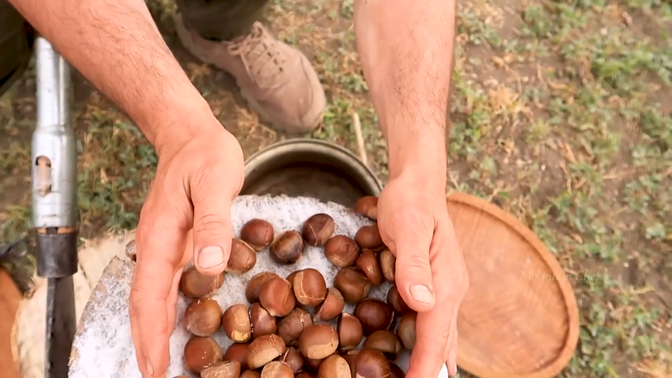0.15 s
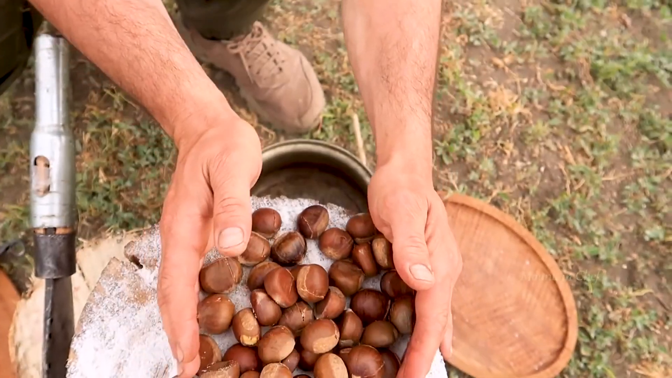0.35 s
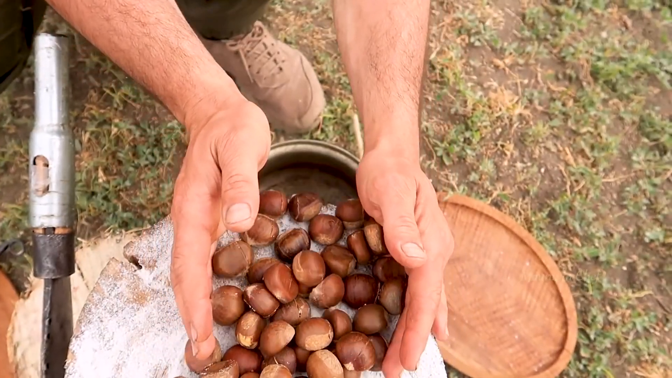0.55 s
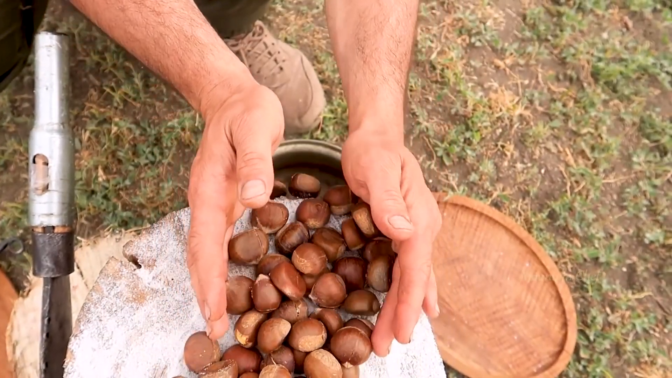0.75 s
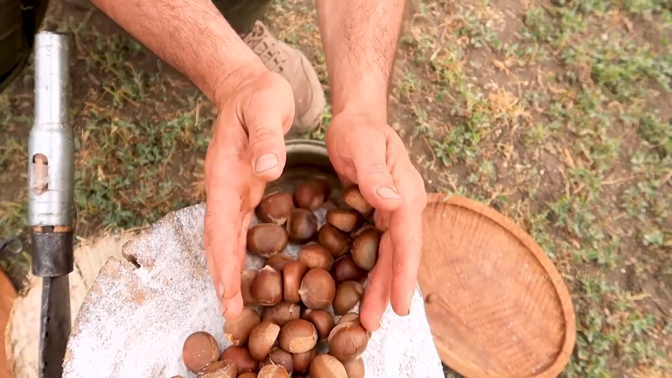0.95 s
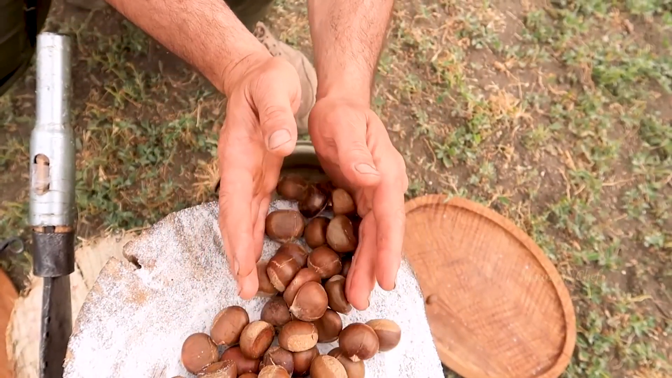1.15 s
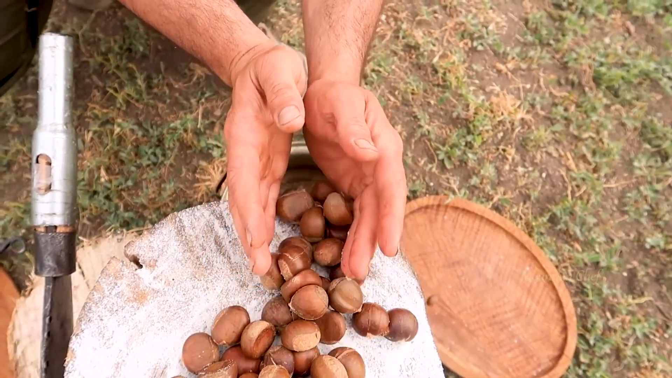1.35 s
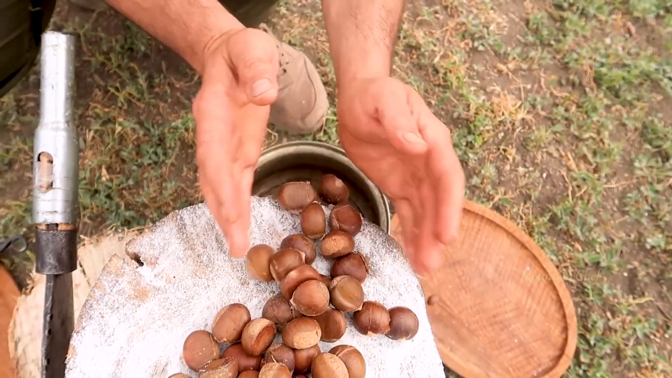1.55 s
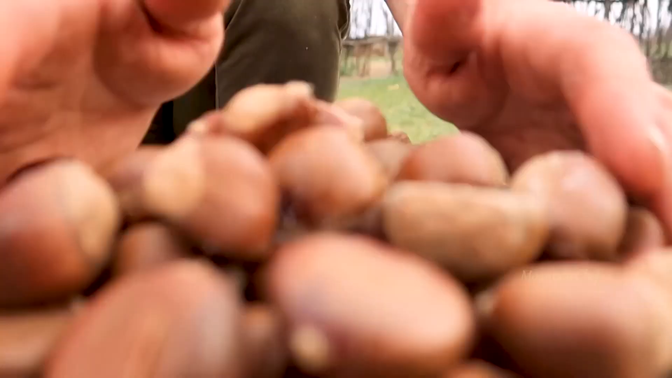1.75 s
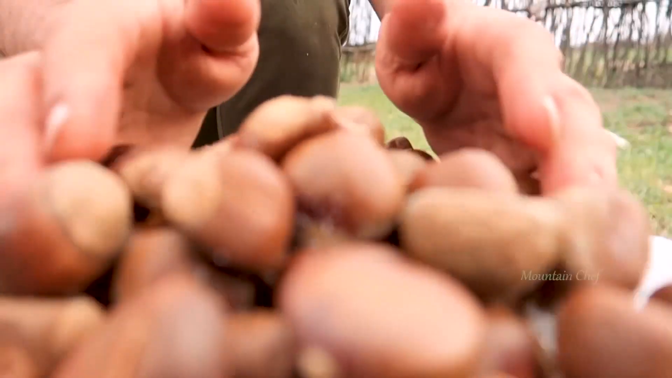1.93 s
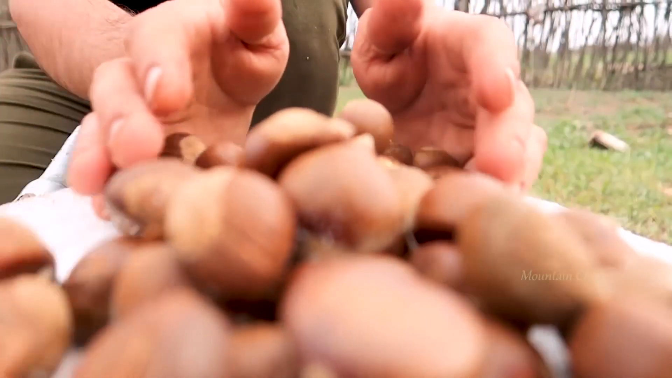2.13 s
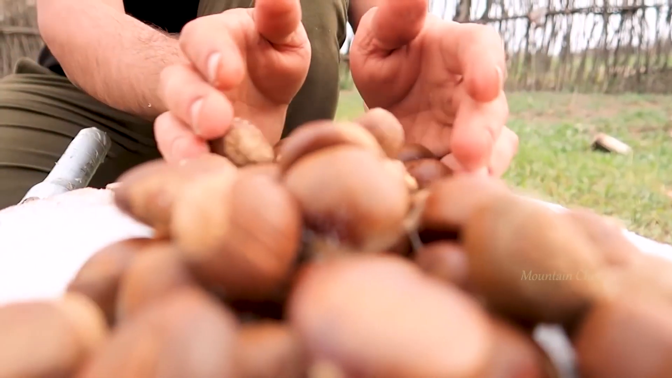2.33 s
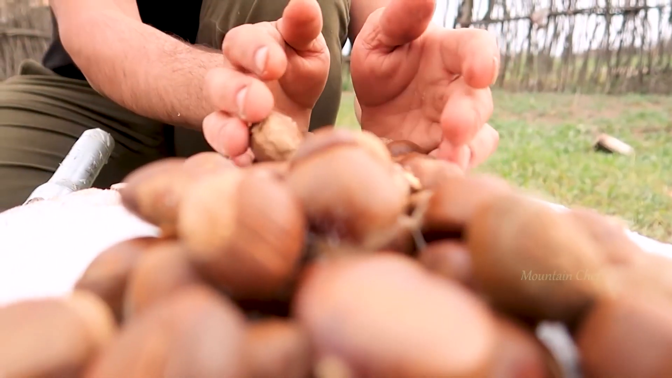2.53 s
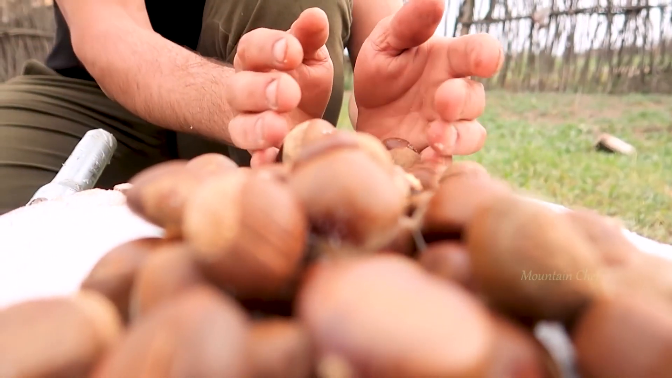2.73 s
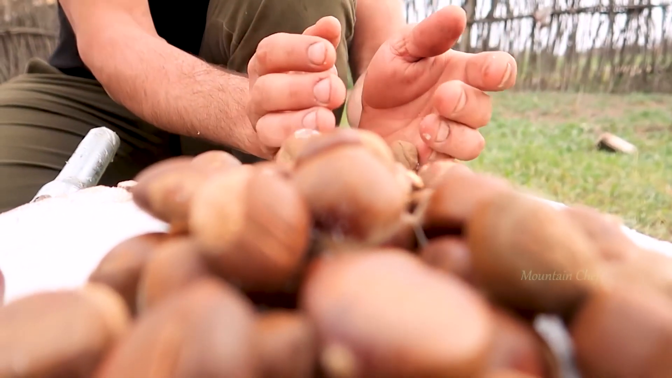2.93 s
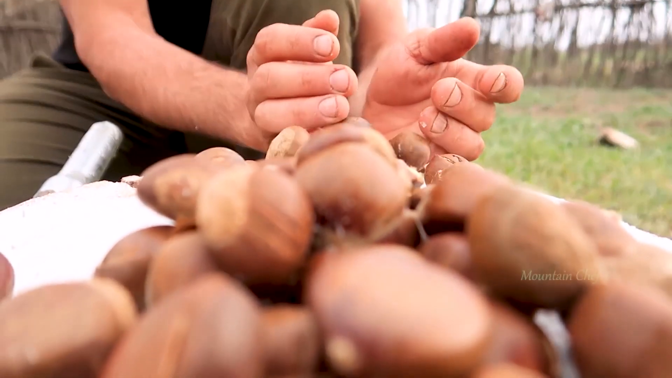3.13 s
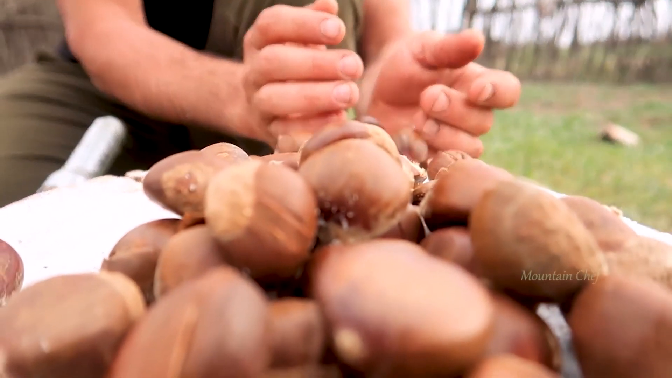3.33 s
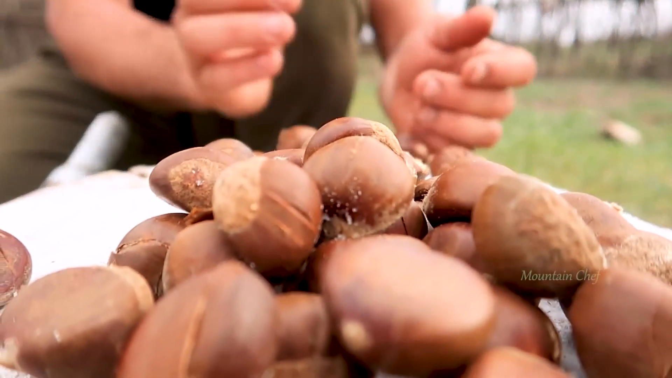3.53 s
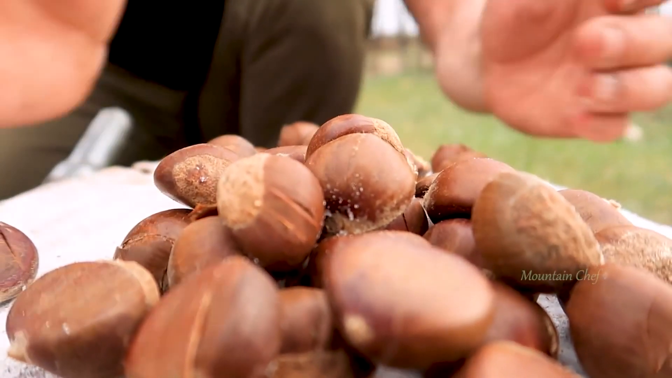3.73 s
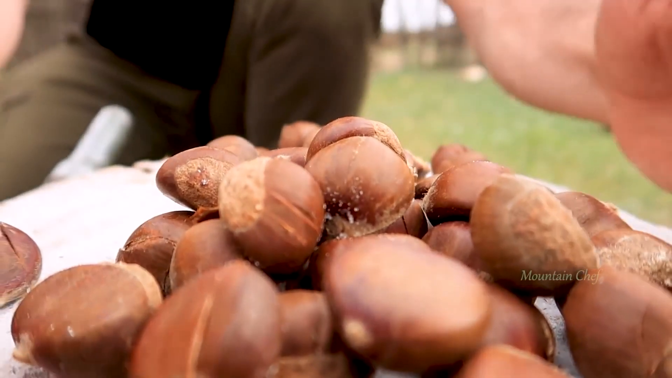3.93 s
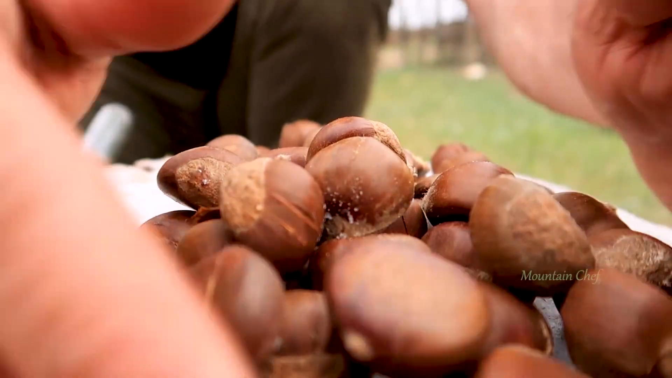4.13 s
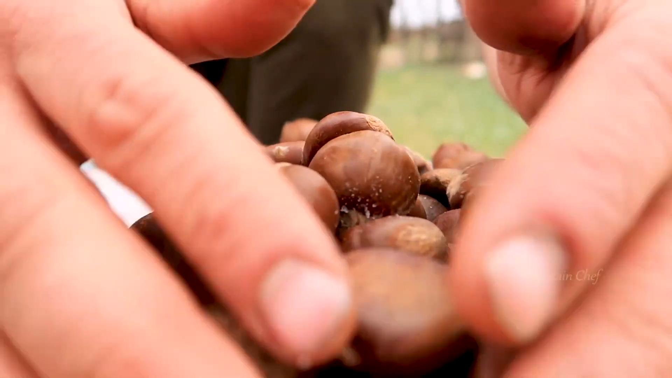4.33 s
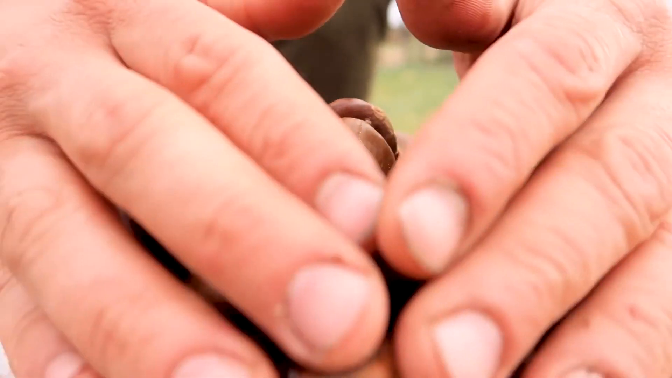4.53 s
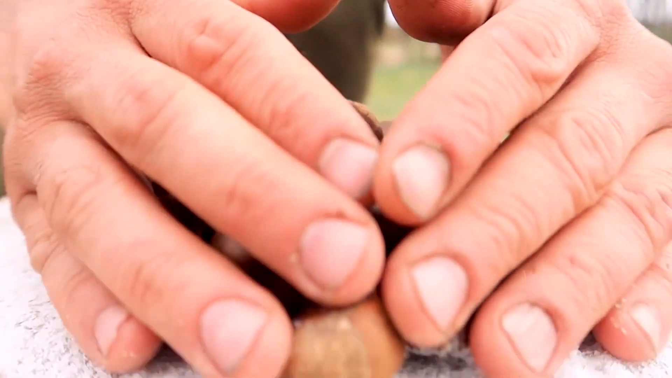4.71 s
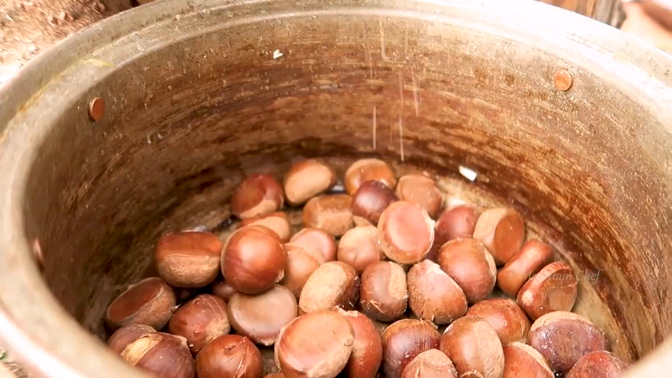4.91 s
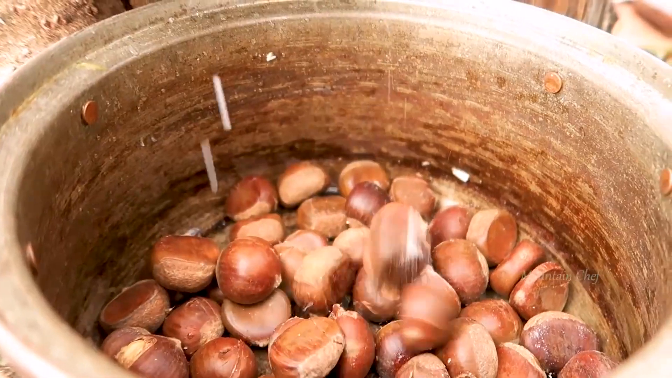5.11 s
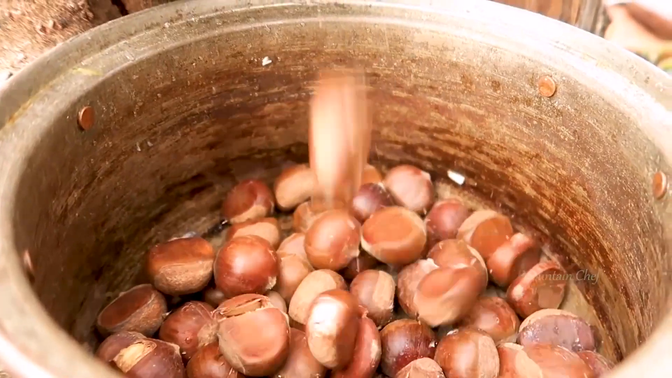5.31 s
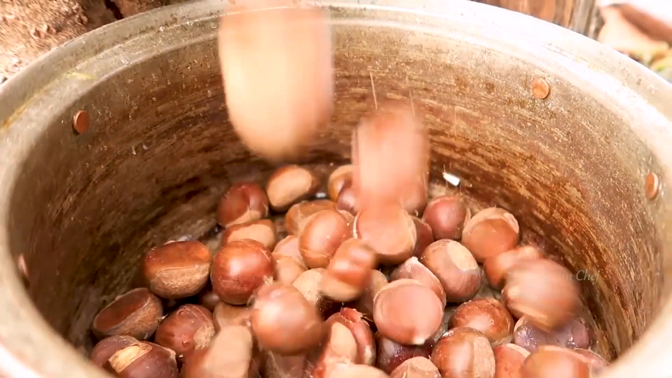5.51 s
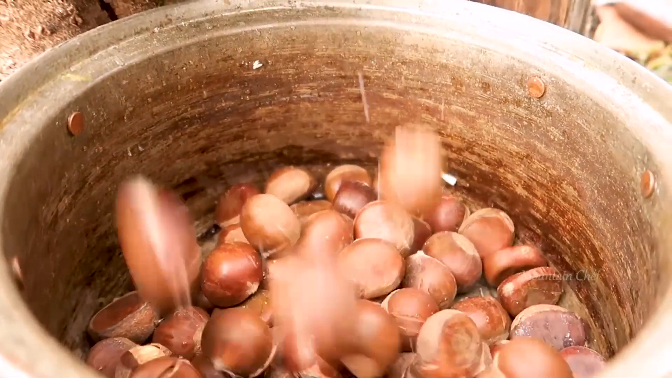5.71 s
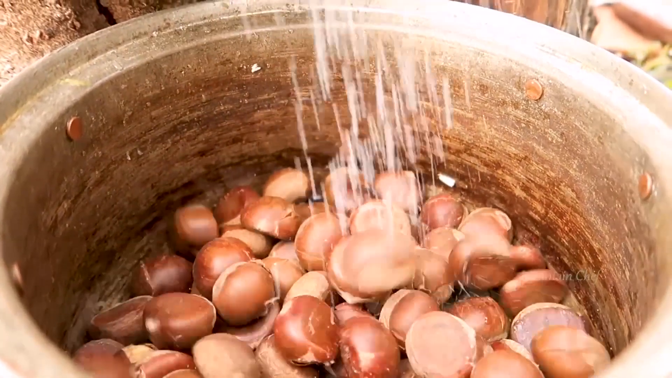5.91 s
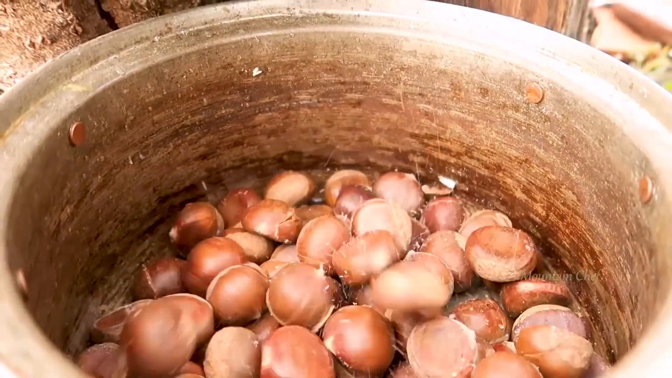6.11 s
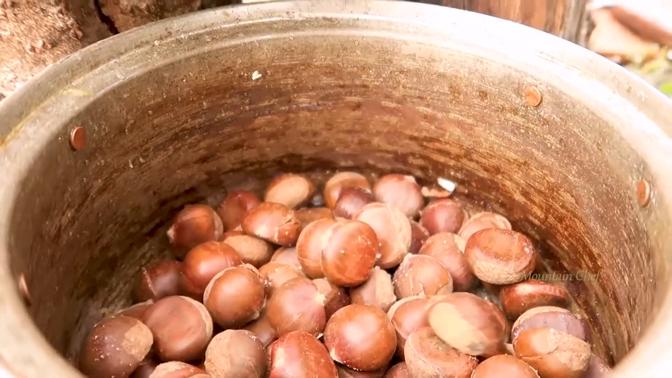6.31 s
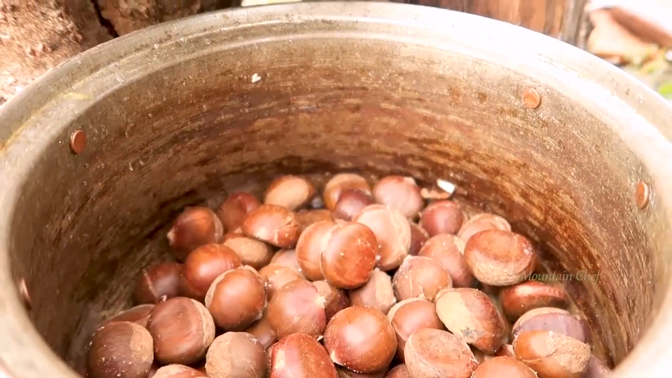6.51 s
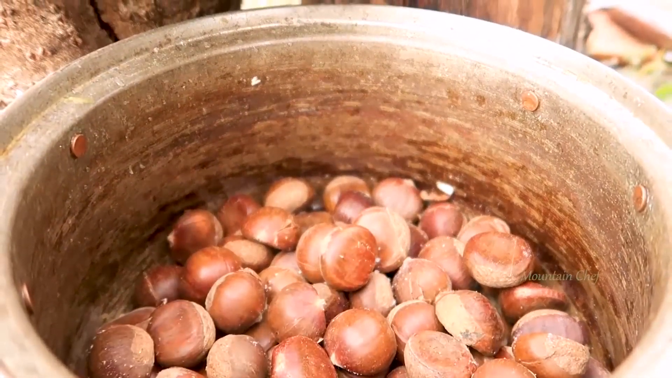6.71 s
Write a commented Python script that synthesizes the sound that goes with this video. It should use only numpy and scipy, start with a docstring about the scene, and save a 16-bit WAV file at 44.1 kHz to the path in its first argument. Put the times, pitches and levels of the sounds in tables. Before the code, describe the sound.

Chestnuts rustle over cloth and tumble with hollow thuds and dry shell cracks into a metal pot, with wind gusts outdoors.

```python
"""Outdoors, hands sweep chestnuts off a cloth-covered stump into a metal pot, with wind on the microphones.
It opens with gusts (low noise) and the rustle of nuts dragged over cloth (tiny grains on a hiss). From 0.56 s
nuts land in three runs, again from 2.8 s and 5 s: a hollow thud, a ring of the pot and a shell crack,
all dying sines, with bright noise bursts, dry ticks and small tumbling knocks around them. From 4.9 s grit
patters on the metal; from about 5.3 s nuts rattle in the pot; after the last landing come dull bumps."""
import sys
import numpy as np
from scipy import signal
from scipy.fft import rfft, irfft, next_fast_len
from scipy.io import wavfile

SR = 44100
rng = np.random.default_rng(int(sys.argv[2]) if len(sys.argv) > 2 else 0)


def log_audio(samples):
    """Write samples as a 16-bit WAV file to the path given in sys.argv[1]."""
    # one column per channel
    frames = np.atleast_2d(samples).T
    # limit to full scale, then quantise
    limited = np.clip(frames, -1, 1)
    pcm = np.round(limited * 32767).astype(np.int16)
    wavfile.write(sys.argv[1], SR, pcm)


N = 302526   # length in samples


def amp(db):
    """Turns decibels into gain."""
    return 10 ** (np.asarray(db) / 20)


def rms_one(x):
    """Scales a sound to an rms (average strength) of 1."""
    return x / np.sqrt(np.mean(x ** 2) + 1e-20)


def in_time(rows):
    """Reads each column of a timed table at every sample."""
    s, *columns = np.transpose(rows)
    return [np.interp(np.arange(N) / SR, s, column) for column in columns]


def at_hz(points, hz):
    """Reads a spectrum between its points, on a log-frequency axis."""
    point_hz, point_db = np.transpose(points)
    return np.interp(np.log(hz), np.log(np.maximum(point_hz, 1)), point_db)


def add(out, s, sound):
    """Mixes a short sound in at time s."""
    at = round(s * SR)
    out[..., at:at + sound.shape[-1]] += sound[..., :N - at]


def span(start_s, length_s, from_db, to_db, edge_s):
    """Gain of a sound that sets in, glides from one level to another and stops."""
    t = np.arange(N) / SR - start_s
    on = np.clip(np.minimum(t, length_s - t) / edge_s, 0, 1)
    return on * amp(from_db + (to_db - from_db) * np.clip(t / length_s, 0, 1))


def drift(rate):
    """Slow random wandering with spread 1; a higher rate wanders faster."""
    r = np.exp(-80 * np.pi * rate / SR)
    # made at one point per 40 samples; the first 2000 points let it settle
    slow = signal.lfilter([1], [1, -2 * r, r * r], rng.standard_normal(N // 40 + 2002))[2000:]
    return np.interp(np.arange(N) / 40, np.arange(len(slow)), rms_one(slow))


def ring(clicks, hz, t60):
    """Each click sets off a dying sine; t60 is the time to fall 60 dB, at least 2 ms."""
    r = amp(-60 / (max(t60, .002) * SR))
    w = 2 * np.pi * hz / SR
    return signal.lfilter([0, np.sin(w)], [1, -2 * r * np.cos(w), r * r], clicks + 1e-18)


def decaying(hz, t60, rise_s, length_s):
    """Sines that swell and die away, one row each; each outline peaks at 1."""
    t = np.arange(int(length_s * SR), dtype=np.float32) / SR
    hz, t60 = np.float32(hz).reshape(-1, 1), np.float32(t60).reshape(-1, 1)
    swell = (1 - np.exp(-t / rise_s)) ** 2
    shape = swell * np.exp(-np.float32(np.log(1000)) * t / t60)
    return shape / shape.max(axis=1, keepdims=True) * np.sin(np.float32(2 * np.pi) * hz * t)


def grains(per_s, spread_db):
    """Random clicks of uneven size and sign."""
    sizes = amp(spread_db * np.minimum(rng.exponential(1, N), 5)) * rng.choice([-1, 1], N)
    return sizes * (rng.random(N) < per_s / SR)


def scraping(per_s, low_hz, top_hz, cycles, patchy_db):
    """Grains shared out among ten short resonances; each pitch comes in patches of its own."""
    clicks, dealt = grains(per_s, spread_db=2.0), rng.integers(0, 10, N)
    total = np.zeros(N)
    for k, hz in enumerate(np.geomspace(low_hz, top_hz, 10)):
        patches = amp(patchy_db * drift(23.4))
        total += hz * patches * ring(clicks * (dealt == k), hz, cycles / hz)
    return rms_one(total)


# how strong the left-right difference (side) is against the middle: pitch_hz, side_db
WIDTH = [(60, -35.5), (200, -27.5), (380, -5), (700, -8.5), (2380, -16.5), (4400, -6.5), (8120, -6.5),
         (15000, 0)]


def coloured(mid, side, spectrum):
    """Filters middle and side to a spectrum, sets the width by pitch and gives left and right."""
    size = next_fast_len(N)
    hz = np.maximum(np.arange(size // 2 + 1) * SR / size, 1)
    colour = amp(at_hz(spectrum, hz))
    mid = irfft(rfft(mid, size) * colour, size)[:N]
    side = irfft(rfft(side, size) * colour * amp(at_hz(WIDTH, hz)), size)[:N]
    return np.array([mid + side, mid - side]) / np.sqrt(np.mean(mid ** 2))


# nuts landing: start_s, thud_db, thud_hz, pot_ring_db (against the thud), crack_db (against the thud)
LANDINGS = [(0.56, 2, 548, -3, -8), (0.767, -25, 510, -14, -21), (0.909, -26, 590, 3, -0.5),
            (0.923, -20, 550, 3, -33), (1.011, -22.5, 555, 0.5, -45), (1.109, -2.5, 535, -13.5, -25.5),
            (1.148, -6.5, 530, 0.5, -13), (1.281, -42.5, 540, 14, 5), (1.33, -12.5, 525, 6.5, -4),
            (1.41, -9, 533, 4, -15), (1.472, -34, 560, -19, 3.5), (1.503, -14.5, 530, -9, -24),
            (1.526, -16, 545, 3, -15), (1.569, -11.5, 518, -9, -35), (1.579, -12, 557, -4, -24),
            (1.677, -17, 536, -12, -20), (1.702, -22.5, 520, -1, -12), (1.737, -26, 534, 7.5, -13),
            (1.84, -33, 550, 14, -22), (1.911, -26, 676, -1, -24), (1.971, -29, 690, -8, -10),
            (2.155, -27, 833, 2, -2.5), (2.802, -4.5, 650, 0, -50), (2.945, -36, 415, -19, 11),
            (3.009, -23, 625, 0, -9), (3.121, -37.5, 670, 8, 9.5), (3.178, -2, 880, 4.5, -12),
            (3.21, -11, 800, 2, -14.5), (3.249, -20, 1010, 10.5, -5), (3.3, -18, 595, -8, -21),
            (3.357, -27, 640, -11, -32), (3.434, -24, 625, -18, -25), (3.464, -11, 630, -3, -16.5),
            (3.477, -11, 797, 8.5, -8), (3.525, -25.5, 655, -6, -12), (3.577, -30.5, 646, -11, -15),
            (3.635, -15.5, 704, -3, -27), (3.685, -21, 684, -1.5, -48), (3.811, -14.5, 677, 5.5, -3.5),
            (3.842, -19, 590, 3, -7), (3.953, -10, 584, -1.5, -14.5), (3.96, -10, 468, -39, -45),
            (4.061, -13.5, 804, 0, -36), (4.076, -15.5, 634, -3.5, -5.5), (4.111, -16, 785, -0.5, -17),
            (4.143, -21.5, 830, -2, -22), (4.659, -30, 805, -23, 7), (5.008, -7, 472, -3.5, -15),
            (5.014, -11.5, 536, -33, -3), (5.057, -21.5, 480, 7, -8.5), (5.068, -18, 750, 2, -29),
            (5.087, -20.5, 510, -10, -26), (5.252, 3.5, 580, -6.5, -14), (5.287, 3, 557, -48, -20),
            (5.347, -3, 598, -1.5, -19.5), (5.356, -11, 513, -28, -34), (5.372, -13, 537, 2.5, -14),
            (5.404, -22, 600, 3, -33), (5.489, -23.5, 575, -21, -14), (5.512, -9.5, 590, -0.5, -19),
            (5.531, -17, 630, -28, -11), (5.554, -8, 530, -42, -20.5), (5.637, -28.5, 534, 11, 6),
            (5.7, -17.5, 520, -3, -9.5), (5.712, -14, 548, -5.5, -10), (5.745, -20, 550, 0.5, -9.5),
            (5.811, -29, 534, 1, -0.5), (5.86, -31, 554, -10, 8), (5.894, -24, 580, 9, 1),
            (5.904, -12, 566, 2, -15.5), (5.96, -22.5, 633, -17, 2.5), (5.971, -17, 466, -5, -28),
            (6.002, -15.5, 550, 2.5, -8.5), (6.056, -4, 636, -31, -18.5), (6.074, -16, 507, -1.5, -14),
            (6.142, -30.5, 533, -18, 1), (6.16, -23, 483, 9.5, -7.5), (6.175, -11.5, 550, -25, -25),
            (6.254, -16, 560, -1.5, -8), (6.267, -16, 503, -37, -26), (6.53, -39.5, 550, -3, -11)]
# natural pitches (modes) of the pot: pitch_hz, relative level_db, t60_s before ring_time scales it
POT_MODES = [(543.3, -11, 0.11), (890, -7.5, 0.084), (939, -9, 0.066), (1082, -13, 0.11),
             (1125, -17.5, 0.032), (1430, -18, 0.073), (1518, -17, 0.031), (1838, -20, 0.077),
             (2260, -19.5, 0.077), (2830, -28, 0.09), (3310, -24, 0.081), (4510, -29, 0.073)]
# colour of a shell crack: pitch_hz, relative level_db
CRACK_COLOUR = [(710, -4.5), (1200, -13.5), (3320, 0.5), (5670, -1.5), (7810, -6.5), (12400, -9.5),
                (15500, -53)]
# how landings sound from each microphone position in turn: time_s, ring_time (times the pot's t60),
# thud_t60 (cycles), low_body_db (against the thud), crack_tilt (dB per octave)
POSITIONS = [(.5, 1.32, 5.9, -21.5, -12), (1.9, 0.92, 13, -42, -10.5), (2.7, 0.55, 12.4, -13.5, -10),
             (4.2, 0.6, 6.4, -9, -13.5), (5.0, 0.52, 5.5, -96, -3.5), (6.86, 0.28, 13, -9, -7.5)]
# a landing shell touches four times: mean gap, loss per touch after a 0 dB thud,
# change of that loss per dB of thud level (a softer thud loses less)
CHATTER_S, CHATTER_LOSS_DB, LOSS_PER_DB = 0.007, 10.5, 0.26


def landings():
    """Each nut thuds, rings the pot modes unevenly, cracks at shell pitches of its own and skids."""
    centre, cracks, skids = np.zeros((2, N)), np.zeros((2, N)), np.zeros(N)
    # each mode sounds as two sines, detuned at random at each landing
    pot_hz, pot_db, pot_t60 = np.transpose(POT_MODES * 2)
    chance = rng.standard_normal((len(LANDINGS), 2, len(pot_hz)))
    shell = rng.random((len(LANDINGS), 4, 96))
    position_s, *position_columns = np.transpose(POSITIONS)
    for landing, (strength, detune), (pitch, size, place, gap) in zip(LANDINGS, chance, shell):
        s, db, hz, ring_db, crack_db = landing
        ring_time, cycles, low_db, tilt_db = [np.interp(s, position_s, column) for column in position_columns]
        # where on the heap it lands: slightly louder left or right
        spot = amp(0.42 * (2 * place[0] - 1) * np.array([[1], [-1]]))

        # the thud and a low body at 400 Hz
        body_hz = np.array([hz, 400])
        body_gain = amp(db + np.array([0, low_db]))
        thud = body_gain @ decaying(body_hz, cycles / body_hz, 0.0053, length_s=0.096)
        add(centre, s, spot * thud)

        struck = amp(db + ring_db - 9 + pot_db + 4 * strength)
        mode_hz = pot_hz * (1 + 0.019 * detune)
        pot = struck @ decaying(mode_hz, pot_t60 * ring_time, 0.0016, length_s=0.15)
        add(centre, s, spot * pot)

        # the crack: 96 short shell pitches, a quarter of them at each touch
        shell_hz = 1200 * 12 ** pitch
        colour_db = at_hz(CRACK_COLOUR, shell_hz) + tilt_db * np.log2(shell_hz / 3000) + 8 * size
        mid = amp(db + crack_db - 13.5 + colour_db) * np.sqrt(shell_hz / 3000)
        side = mid * amp(at_hz(WIDTH, shell_hz) + 4.5) * (2 * place - 1)
        left_right = np.array([mid + side, mid - side])
        rings = decaying(shell_hz, 0.022 + 22.5 / shell_hz, 0.000095, length_s=0.024)
        gaps = 2 * CHATTER_S * gap[:4]
        loss_db = max(CHATTER_LOSS_DB + LOSS_PER_DB * db, 0)
        for k, late in enumerate(np.cumsum(gaps) - gaps[0]):
            add(cracks, s + late, amp(-loss_db * k) * left_right[:, k::4] @ rings[k::4])
        skids[round(s * SR)] += amp(db + crack_db - 24.5)
    # after the crack the nut skids over the others: grains that fall 60 dB in 0.12 s
    dying = signal.lfilter([1], [1, -amp(-60 / (.12 * SR))], skids)
    skidding = coloured(rms_one(grains(1200, spread_db=5)), rng.standard_normal(N), CRACK_COLOUR)
    return centre, cracks + dying * skidding


# colour of the bright burst as shells meet: pitch_hz, relative level_db
SNAP_COLOUR = [(1500, -4.5), (3000, 3), (7000, -2), (12000, -7), (16000, -32)]
SNAP_DB, SNAP_TUMBLE_DB = -45.5, -12   # drive against the crack; against a tumbling knock
SNAP_T60_S, SNAP_RISE_S = 0.0054, 0.0017
SNAP_TILT_OCTAVES = 0.81   # the burst's level follows the crack tilt by this many octaves


def snaps(tumble):
    """Every landing and tumbling contact of two shells gives a short bright burst of noise."""
    kicks = amp(SNAP_TUMBLE_DB) * np.abs(tumble)
    for s, db, _, _, crack_db in LANDINGS:
        kicks[round(s * SR)] += amp(db + crack_db + SNAP_DB)
    rise, fall = np.exp(-1 / (SNAP_RISE_S * SR)), amp(-60 / (SNAP_T60_S * SR))
    shape = signal.lfilter([1 - rise], np.convolve([1, -rise], [1, -fall]), kicks)
    tilt = amp(SNAP_TILT_OCTAVES * in_time(POSITIONS)[-1])
    left, right = shape * tilt * coloured(*rng.standard_normal((2, N)), SNAP_COLOUR)
    return np.array([left, np.roll(right, 1)])      # the right microphone hears it one sample later


# the thin rim rings longer: pitch_hz, relative level_db, t60_s
RIM_MODES = [(2400, 2, 0.4), (3160, 2.5, 0.4), (4190, -1.5, 0.19)]
# nuts that clip the rim: start_s, level_db
RIM_HITS = [(2.948, -43), (4.077, -46.5)]


def rim():
    """Glancing blows set the rim's own pitches ringing."""
    out, (hz, db, t60) = np.zeros(N), np.transpose(RIM_MODES)
    for s, hit_db in RIM_HITS:
        add(out, s, amp(hit_db + db) @ decaying(hz, t60, 0.0044, length_s=0.26))
    return out


# dry ticks of two shells meeting, clear of the rustle: start_s, level_db, pitch_hz
CLEAR_TICKS = [(0.813, -27, 3950), (3.353, -37, 2030), (3.4187, -34, 2570), (3.897, -36, 2160),
               (3.9107, -28, 2090), (4.914, -26, 2060), (5.3349, -21.5, 2850), (5.4104, -27, 5000),
               (5.42, -27, 2100), (5.536, -23.5, 2270), (5.5873, -24, 1950), (5.6108, -23.5, 2400),
               (6.2195, -28.5, 3550), (6.31, -33, 4020), (6.38, -49, 2100), (6.5093, -46, 2240),
               (6.5318, -30, 2480), (6.627, -43.5, 1685), (6.703, -32.5, 2400), (6.738, -35, 4500),
               (6.788, -34, 1430), (6.8202, -27.5, 2260)]
TICK_CYCLES, TICK_OVERTONE_DB = 27, -16   # cycles to fall 60 dB; level of each weaker partial


def ticks():
    """Each tick rings a few cycles at its pitch, with six weaker partials scattered around it."""
    out = np.zeros(N)
    for (s, db, hz), scatter in zip(CLEAR_TICKS, rng.random((len(CLEAR_TICKS), 6))):
        partial_hz = hz * np.append(1, .55 * 3.4 ** scatter)
        gains = amp(db + np.append(0, np.full(6, TICK_OVERTONE_DB)))
        add(out, s, gains @ decaying(partial_hz, TICK_CYCLES / hz, 0.00033, length_s=.03))
    return out


# slow course of the tumbling among nuts that shift and roll: time_s, level_db
TUMBLE_COURSE = [(0.0, -67), (.8, -76), (1.6, -60.5), (1.77, -53), (1.9, -59.5), (2.64, -52.5),
                 (2.7, -62.5), (3.3, -50.5), (3.58, -50.5), (3.61, -57), (4.25, -59), (4.6, -67),
                 (5.2, -64), (5.4, -55.5), (5.49, -55), (5.65, -47), (6.3, -53), (6.4, -70.5), (6.6, -70),
                 (6.86, -103.5)]
STIR_DB, STIR_T60_S = -40.5, 0.12   # a landing stirs its neighbours: level against the thud, time to settle


def stirred():
    """How strongly the nuts tumble: a slow course, and a dying stir after each landing."""
    tumble_db, = in_time(TUMBLE_COURSE)
    kicks = np.zeros(N)
    for s, db, *_ in LANDINGS:
        kicks[round(s * SR)] += amp(db + STIR_DB)
    return amp(tumble_db) + signal.lfilter([1], [1, -amp(-60 / (STIR_T60_S * SR))], kicks + 1e-18)


# favoured pitch of the small knocks: time_s, pitch_hz
FAVOURED_PITCH = [(0, 605), (1.8, 560), (1.9, 730), (2.6, 960), (4.2, 780), (5.0, 600)]
# the clearest small knocks, among them weak landings, each at the favoured pitch: start_s, level_db
CLEAR_KNOCKS = [(1.033, -22), (1.076, -25), (1.775, -33), (1.794, -19), (3.051, -38), (3.551, -31),
                (3.881, -26), (3.928, -20.5), (5.041, -17), (5.325, -47), (5.392, -26), (5.422, -24),
                (5.434, -17.5), (5.655, -35), (5.687, -29), (5.727, -15), (5.737, -23), (5.762, -17.5),
                (6.36, -33)]
TUMBLE_FALL_DB = 19   # loss per squared octave away from the favoured pitch


def tumbling(clicks):
    """Small knocks among the nuts, shared out among hollow pitches; they stir the pot modes faintly."""
    pitches, dealt = np.geomspace(420, 1250, 12), rng.integers(0, 12, N)
    favoured_hz, = in_time(FAVOURED_PITCH)
    clear = np.zeros(N)
    for s, db in CLEAR_KNOCKS:
        at = round(s * SR)
        clear[at] = amp(db)
        dealt[at] = np.argmin(np.abs(pitches - favoured_hz[at]))
    clicks = clicks + clear
    rings = np.zeros(N)
    for k, hz in enumerate(pitches):
        favour = amp(-TUMBLE_FALL_DB * np.log2(hz / favoured_hz) ** 2)
        rings += ring(clicks * (dealt == k) * favour, hz, 24.5 / hz)
    # all pot modes but the lowest
    pot = amp(-11.5) * sum(amp(db) * ring(clicks, hz, 0.28 * t60) for hz, db, t60 in POT_MODES[1:])
    # the treble is softened, then the bass is cut
    soft = signal.lfilter([.2], [1, -.8], rings) + signal.lfilter([.4], [1, -.6], pot)
    return signal.sosfilt(signal.butter(2, 380, "high", fs=SR, output="sos"), soft)


def ticking(rustle_db, stir):
    """Shells meet with small dry ticks, short rings at eight pitches, as nuts rustle or tumble."""
    level = amp(rustle_db - 20.0) + amp(-1.5) * stir
    clicks = level * rms_one(grains(400, spread_db=6.0))
    pitches, dealt = np.geomspace(1000, 4600, 8), rng.integers(0, 8, N)
    rings = sum(ring(clicks * (dealt == k), hz, 26.0 / hz) for k, hz in enumerate(pitches))
    return rms_one(rings) * np.std(clicks)


# swells of rustle: nuts dragged over cloth, and from about 5.3 s nuts rattling in the pot:
# start_s, length_s, first_db, last_db
SWELLS = [(0.079, 0.52, -49, -39.5), (0.577, 1, -51, -53), (1.649, 0.19, -44, -54),
          (1.833, 0.86, -38.5, -39.5), (2.671, 0.99, -42.5, -80), (2.888, 0.45, -41, -62),
          (3.237, 0.83, -67.5, -56), (4.242, 1.132, -39, -39), (5.372, 0.14, -24, -67.5),
          (5.517, 0.34, -43.5, -44.5), (5.87, 0.31, -43, -52.5), (6.143, 0.24, -68, -47.5),
          (6.617, 0.25, -61.5, -38)]
SWELL_EDGE_S, STILL_DB = 0.047, -63.5   # time to set in or stop; steady rustle under the swells


def rustle_level():
    """Level of the rustle in decibels: a faint floor plus every swell."""
    return 20 * np.log10(amp(STILL_DB) + sum(span(*swell, SWELL_EDGE_S) for swell in SWELLS))


# colour of the rustle: pitch_hz, relative level_db
RUSTLE_COLOUR = [(180, -6), (300, -2), (500, -11.5), (849, -8), (1750, -2), (3230, -0.5), (5130, -9),
                 (11000, -18.5), (13800, -30.5), (15500, -101.5)]


def rustle(level_db):
    """Shells scraping over cloth, later rattling in the pot: patchy grains on a smooth hiss."""
    rough = scraping(5000 * amp(2.0 * drift(35)), 833, 5970, cycles=16.6, patchy_db=6.5)
    noise = rng.standard_normal((2, N))
    flutter = amp(0.84 * drift(30) + 1.5 * drift(9.5))      # the level wavers a little
    return amp(level_db) * flutter * coloured(rough + 1.58 * noise[0], 1.6 * noise[1], RUSTLE_COLOUR)


GRIT_FROM_S, GRIT_EDGE_S, GRIT_DB = 4.9, 0.046, -8   # start, fade-in, level against the rustle


def grit(rustle_db):
    """Fine grains tick on the metal, following the rustle; the right microphone is two samples late."""
    fade_in = np.clip((np.arange(N) / SR - GRIT_FROM_S) / GRIT_EDGE_S, 0, 1)
    rain = fade_in * amp(rustle_db + GRIT_DB)
    patter = rain * scraping(6000, 6700, 14500, cycles=14.0, patchy_db=6.0)
    return np.array([patter, np.roll(patter, 2)])


# dull low bumps: start_s, level_db, pitch_hz
BUMPS = [(2.329, -23, 268), (2.656, -20, 167), (6.674, -32, 103), (6.72, -37, 89), (6.785, -29, 128)]


def thumps():
    """Dull low bumps, each one short dying sine."""
    out = np.zeros(N)
    for s, db, hz in BUMPS:
        add(out, s, amp(db) * decaying(hz, 0.035, 0.00069, length_s=.1)[0])
    return out


# low noise: gusts of wind on the microphones, and one short low push under the loud hits at 5.25 s: start_s,
# length_s, first_db, last_db
LOW_NOISE = [(0.003, 0.12, -47, -23.5), (0.16, 0.36, -41, -54), (1.87, 0.36, -51, -58),
             (2.32, 0.77, -40.5, -51), (2.812, 0.1, -42, -29), (2.91, 0.2, -57, -19.5),
             (3.11, 0.48, -46, -56), (3.621, 0.21, -56, -30), (3.864, 0.302, -35, -39.5),
             (4.162, 0.73, -50, -64), (4.634, 0.25, -41, -27.5), (5.241, 0.052, -16, -38),
             (6.67, 0.16, -64, -41)]
# colour of the low noise: pitch_hz, relative level_db
LOW_NOISE_COLOUR = [(12, -42), (20, -7), (48, 6.5), (137, -3), (206, -16), (300, -26), (660, -120)]
LUMPS_DB, LOW_SIDE_DB = 2.5, 22   # spread of the lumps; boost of the side before WIDTH acts
CALM_DB, LOW_EDGE_S = -63.5, 0.03   # steady wind under the rest; time each burst takes to set in or stop


def low_noise():
    """Wind, and one short push under loud hits: lumpy low noise, partly its own on each microphone."""
    level = amp(CALM_DB) + sum(span(*burst, LOW_EDGE_S) for burst in LOW_NOISE)
    lumps = amp(LUMPS_DB * drift(23.0))
    mid, side = rng.standard_normal((2, N))
    return level * lumps * coloured(mid, amp(LOW_SIDE_DB) * side, LOW_NOISE_COLOUR)


def scene():
    """All sources at the microphone pair."""
    rustle_db = rustle_level()
    stir = stirred()
    tumble = stir * rms_one(grains(240 * amp(4 * drift(15)), spread_db=3))
    knocks, cracks = landings()
    # a small pot sends out little bass
    knocks = signal.sosfilt(signal.butter(2, 300, "high", fs=SR, output="sos"), knocks)
    centre = knocks + thumps() + rim() + ticks() + ticking(rustle_db, stir) + tumbling(tumble)
    leaning = centre * amp([[.15], [-.15]])      # a touch louder on the left
    return leaning + cracks + snaps(tumble) + rustle(rustle_db) + grit(rustle_db) + low_noise()


CUTOFF_HZ = 16100   # from here up the treble is cut by 70 dB


def record(dry):
    """The loudest peaks flatten at full scale; the top is cut."""
    flat = dry / (1 + np.abs(dry) ** 6) ** (1 / 6)
    return signal.sosfilt(signal.cheby2(12, 70, CUTOFF_HZ, fs=SR, output="sos"), flat)


dry = scene()
out = record(dry)
log_audio(out)
```